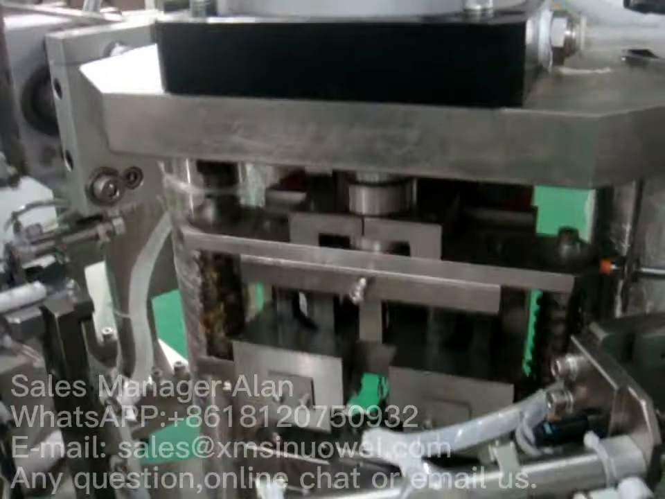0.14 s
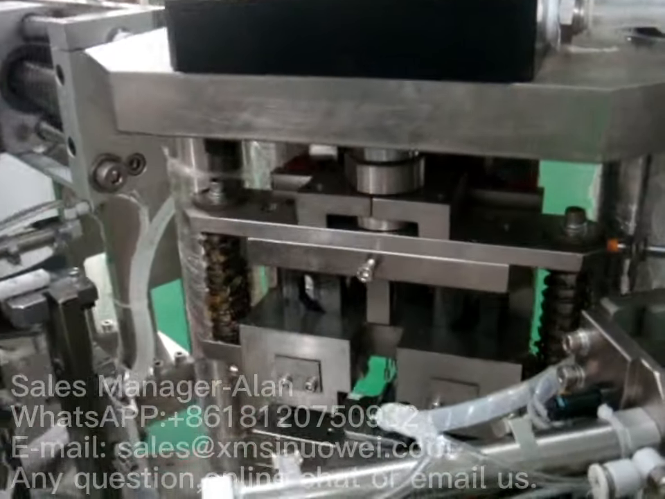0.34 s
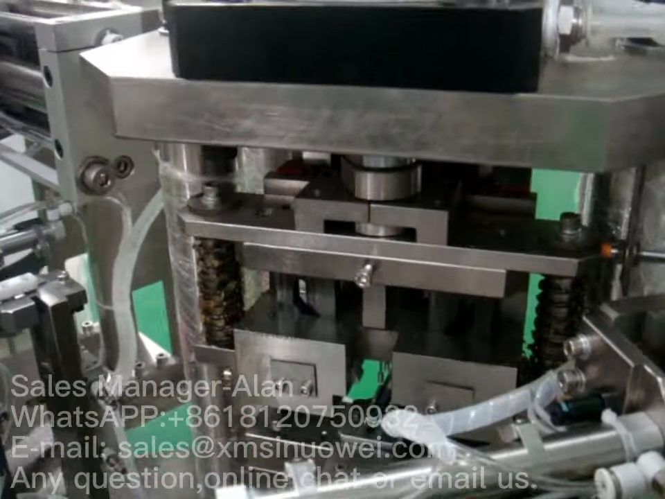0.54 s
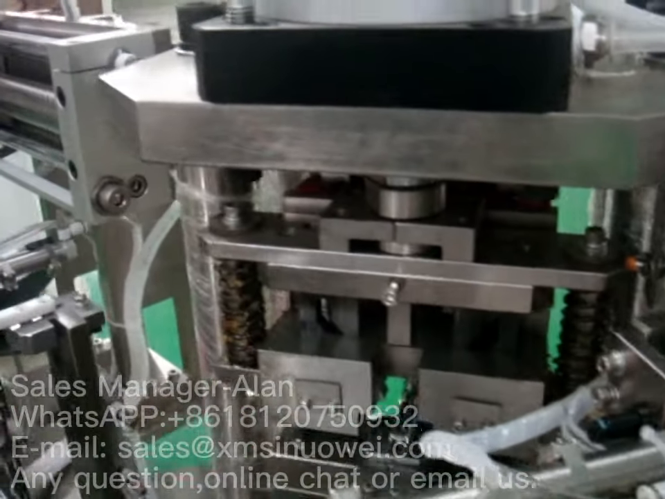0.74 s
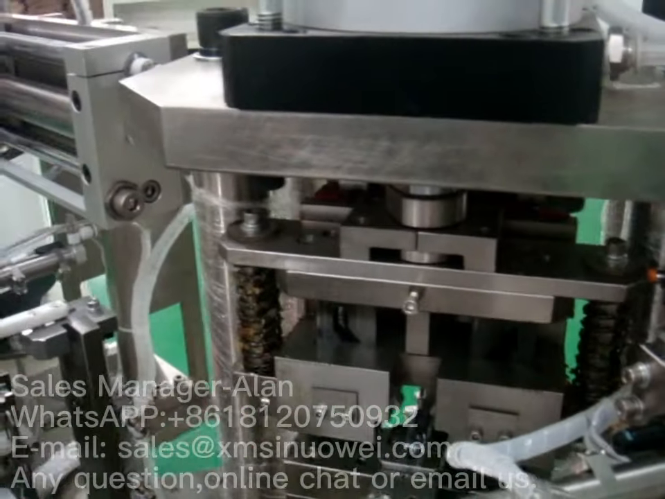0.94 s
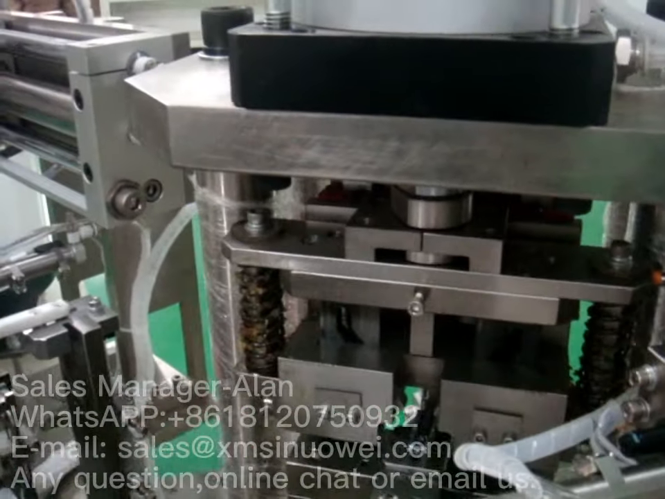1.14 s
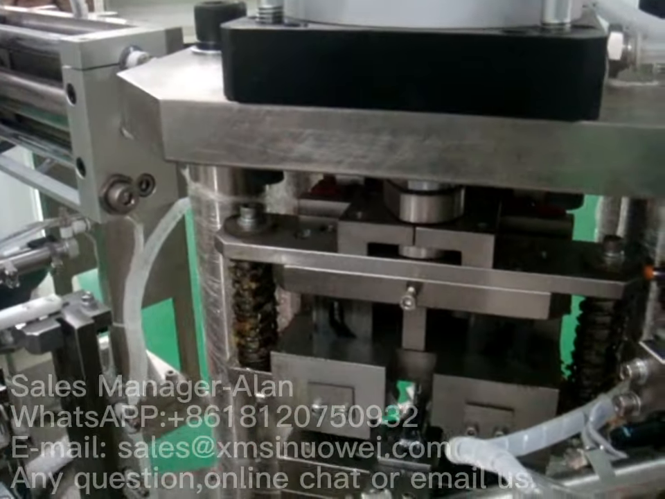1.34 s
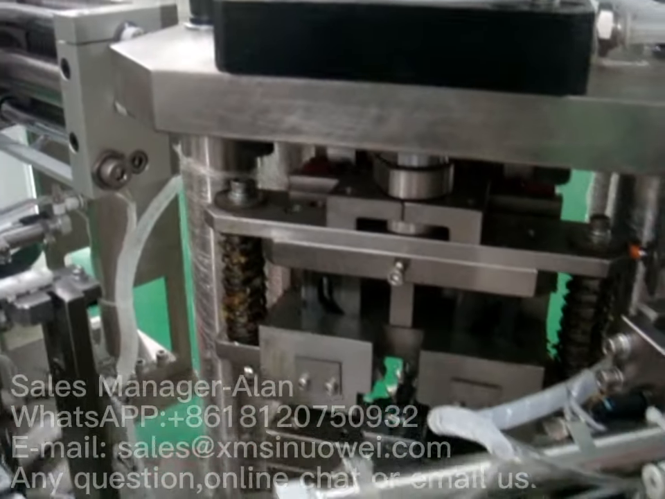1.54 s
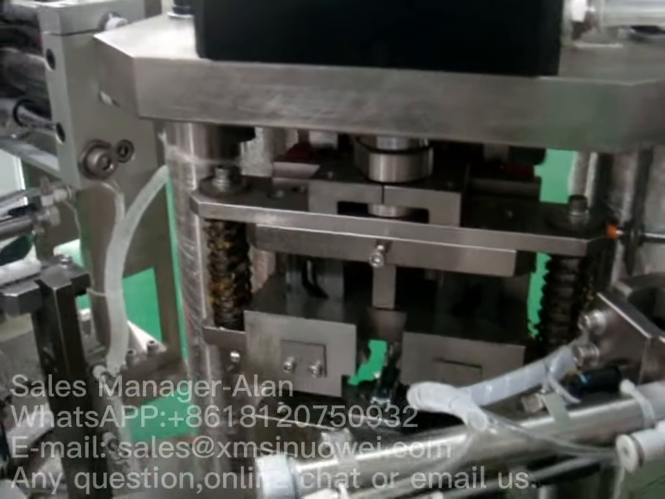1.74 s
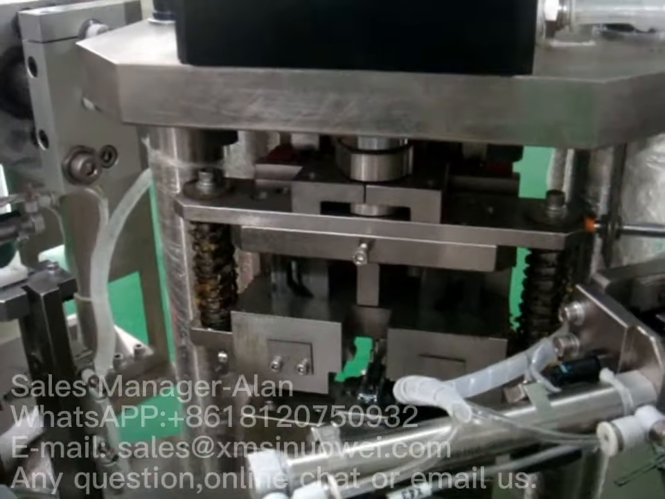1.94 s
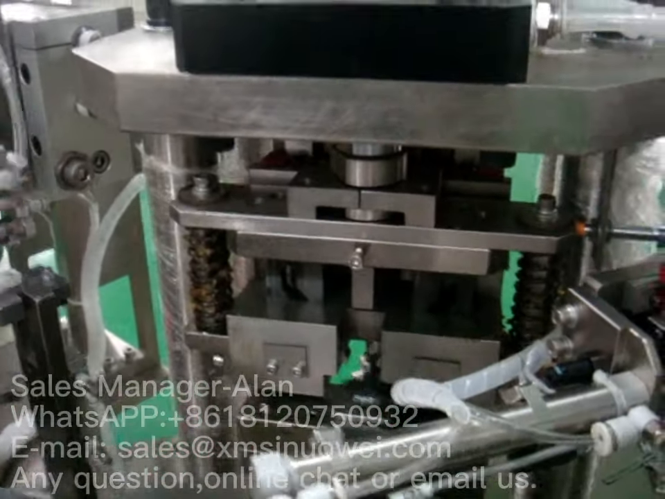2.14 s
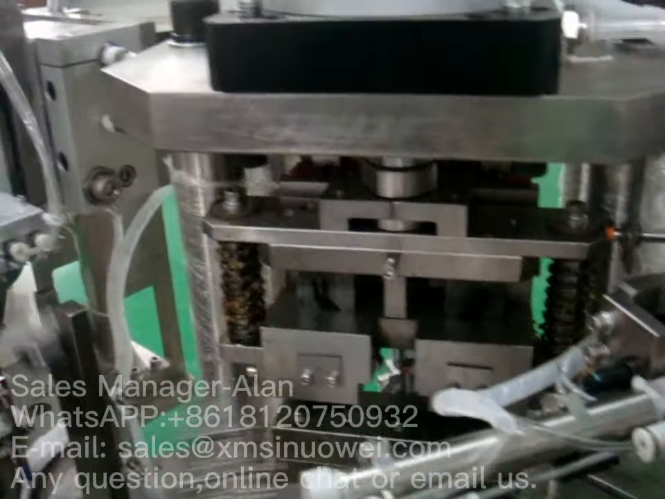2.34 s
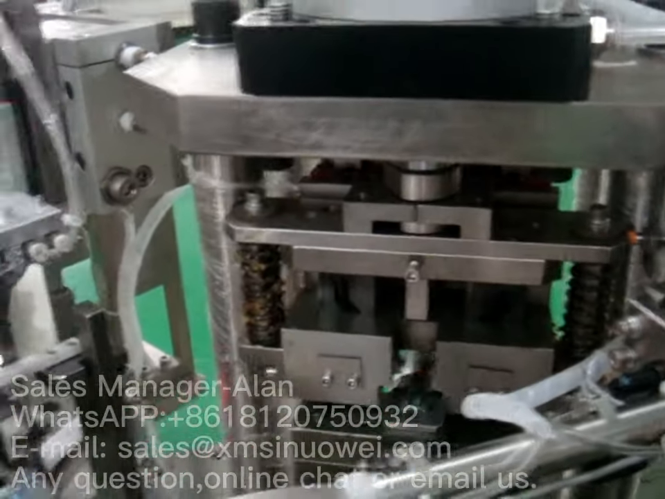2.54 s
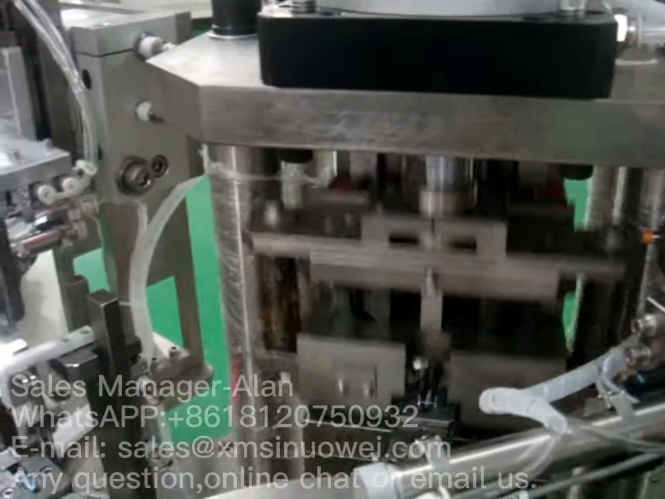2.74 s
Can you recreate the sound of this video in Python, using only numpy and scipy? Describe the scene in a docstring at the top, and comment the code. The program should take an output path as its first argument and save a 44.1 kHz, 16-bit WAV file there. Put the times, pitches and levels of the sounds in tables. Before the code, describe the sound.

Automatic assembly machinery close up: constant feeder hiss, hard cracks and thuds on a steel frame, gripper ticks, air puffs, and background machine din.

```python
"""A factory hall, with the microphones close to an automatic assembly machine.
The hall's din, drone and hum are shaped noise and tones; behind the machine's blows, bowl feeders, shaken at
twice the mains frequency, rattle small metal parts in a steady hiss: countless collisions, coloured by the bowls.
A press and slides knock on the frame in their own cycles, cylinders vent amid other swells of band noise,
grippers tick and steel parts ring; the recorder's gain control ducks the hiss after the hardest blows."""
import sys
import numpy as np
from scipy import signal
from scipy.fft import rfft, irfft, next_fast_len
from scipy.io import wavfile
from scipy.ndimage import uniform_filter1d

SR = 44100
rng = np.random.default_rng(int(sys.argv[2]) if len(sys.argv) > 2 else 0)


def output_pcm(signal):
    """Save a mono or channel-first signal as 16-bit PCM at the path in sys.argv[1].

    Samples are clipped to [-1, 1] before scaling.
    """
    pcm = np.clip(np.atleast_2d(signal).T, -1, 1) * 32767
    wavfile.write(sys.argv[1], SR, np.round(pcm).astype(np.int16))


N = 306915
TIME, PADDED = np.arange(N) / SR, next_fast_len(N, real=True)
FREQ = np.fft.rfftfreq(PADDED, 1 / SR)
# the cycles of the press and of the slides [s]; ONCE is too long to come round again
PRESS_S, SLIDE_S, ONCE = 3.396, 3.282, 99
# the pitch of a gripper's jaw and of a latch [Hz]
JAW_HZ, LATCH_HZ = 2970, 1244


def amp(db):
    """Decibels to gain."""
    return 10 ** (np.asarray(db) / 20)


def unit(x):
    """Scales to an rms of 1."""
    return x / np.sqrt(np.mean(x ** 2) + 1e-20)


def spectrum(points, hz):
    """Gain along straight lines in dB over log frequency."""
    f, db = np.transpose(points)
    return amp(np.interp(np.log(hz + 1), np.log(f), db))


def lifted(modes, hz):
    """Gain of a set of resonant bumps."""
    return amp(sum(db / (1 + (2 * (hz - f) / width) ** 2) for f, width, db in modes))


def level(curve):
    """A dB curve as a gain for every sample."""
    return amp(np.interp(TIME, *np.transpose(curve)))


def coloured(x, gain):
    """Filters x by a gain for every frequency; rms 1."""
    return unit(irfft(rfft(x, PADDED) * gain, PADDED)[:N])


def wander(rate):
    """Slow chance, up to about rate changes a second."""
    return coloured(rng.standard_normal(N), 1 / (1 + (FREQ / rate) ** 4))


def bell(hz, centre, octaves):
    """Gain of a Gaussian band over log frequency."""
    return np.exp(-.5 * (np.log2((hz + 1) / centre) / octaves) ** 2)


def add(mix, s, sound):
    """Mixes a sound in at time s."""
    part = mix[max(round(s * SR), 0):][:len(sound)]
    part += sound[:len(part)]


def at_level(sound, db):
    """Sets the rms level of the first 10 ms of a hit."""
    return amp(db) * sound / np.sqrt(np.mean(sound[:SR // 100] ** 2) + 1e-20)


def without_bass(x, edge_hz):
    """A high-pass: the struck bodies radiate little below edge_hz."""
    return signal.sosfilt(signal.butter(2, edge_hz, "high", fs=SR, output="sos"), x)


def room(x, t60=1.0, delay_s=0.011):
    """The diffuse echo of the hall: sparse random reflections that die away."""
    t = np.arange(SR) / SR
    taps = rng.standard_normal(SR) * (rng.random(SR) < 1 / 20)
    taps *= (t > delay_s) * amp(-60 * t / t60)
    return signal.fftconvolve(x, taps / np.linalg.norm(taps))[:N]


def hall(din_db=0.9, lumpy_db=1.0, drone_db=-7, drone_hz=170):
    """The uneven din of other machines, a low drone of the drives and the feeder magnets' hum."""
    # colour of the distant din: (frequency [Hz], relative density [dB per Hz])
    din_colour = [(25, -47.5), (70, -29), (115, -20.5), (150, -11.5), (250, -10.5), (350, -9.5),
                  (400, -3.5), (600, 0), (900, 1.5), (1300, -1), (2000, 0.5), (4000, -25), (9000, -40)]
    # resonances in the din: (frequency [Hz], width [Hz], lift [dB])
    din_modes = [(150, 6.4, 6.1), (291, 20, 5), (326, 13, 4.8), (375, 29, 3.7), (674, 3.4, 5),
                 (953, 31, 4.8), (1046, 81, 6.1), (1230, 110, 2.3)]
    # level of the din, before din_db: (time [s], level [dB])
    din_level = [(0.0, -31), (.7, -31), (1.9, -30.5), (3.4, -31.5), (4.2, -30), (5.7, -28.5), (6.96, -30)]
    # level of the drone, before drone_db: (time [s], level [dB])
    drone_level = [(0.0, -51), (.7, -45), (1.9, -62), (3.2, -63), (3.9, -42.5), (4.7, -44.5), (5.3, -50),
                   (6.2, -41), (6.96, -52)]
    # tones of the magnets: (frequency [Hz], mean level [dB])
    hum_tones = [(100.13, -57), (701, -47), (1051, -45.5)]
    din = coloured(rng.standard_normal(N), spectrum(din_colour, FREQ) * lifted(din_modes, FREQ))
    din *= level(din_level) * amp(din_db + lumpy_db * wander(25))
    drone = coloured(rng.standard_normal(N), bell(FREQ, drone_hz, 0.5))
    drone *= level(drone_level) * amp(drone_db)
    hum = np.zeros(N)
    for hz, db in hum_tones:
        strength = amp(db + 0.45 * wander(3)) * np.sqrt(2)
        hum += strength * np.sin(2 * np.pi * hz * TIME + hz / 900 * wander(9.1))
    return din + drone + hum


def feeders(hits_per_s=9000, size_db=3.0, wash=0.65, ring_t60=0.015, shake_hz=100.13, throb=0.035,
            flutter_db=0.5, patchy_db=0.58, gain_db=3.0, treble_db=0.58, dulling_db_per_s=0.17):
    """Countless tiny collisions, bunched by each shake of the bowl, over the wash of their echoes."""
    # colour of the rattling parts: (frequency [Hz], relative density [dB per Hz])
    rattle_colour = [(500, -44.5), (1000, -13), (1600, -9.5), (2200, -5.5), (2900, -4), (4000, -2),
                     (5700, -0.75), (6700, -1.85), (7600, -1.9), (8700, -3.5), (10000, -7)]
    # resonances of the bowls and tracks: (frequency [Hz], width [Hz], lift [dB])
    bowl_modes = [(2106, 58, 5), (2830, 130, 2), (3000, 12, -0.5), (3450, 56, 3), (4710, 99, -1),
                  (6090, 53, 4.5), (6560, 40, 0), (6640, 51, 7.5), (8030, 170, -3.5)]
    # how busy the bowls are, before gain_db: (time [s], level [dB])
    feed_level = [(0.0, -20), (.6, -19.5), (1.05, -20.5), (1.5, -18.5), (2.7, -20), (3.9, -19.5),
                  (4.6, -19.5), (5.7, -19.5), (6.2, -19), (6.96, -20)]
    t = np.arange(SR // 50) / SR
    size = amp(size_db * np.minimum(rng.exponential(1, N), 4))
    size *= rng.random(N) < hits_per_s / SR
    size *= rng.choice([-1, 1], N)
    # every way of colliding has its own brief ring
    rings = rng.standard_normal(size=(24, len(t))) * amp(-60 * t / ring_t60)
    kind = rng.integers(0, len(rings), N)
    hits = sum(signal.oaconvolve(size * (kind == k), ring)[:N] for k, ring in enumerate(rings))
    shake = 1 + throb * np.cos(2 * np.pi * shake_hz * TIME)
    drive = unit(hits) * shake + wash * rng.standard_normal(N)
    rattle = coloured(drive, spectrum(rattle_colour, FREQ) * lifted(bowl_modes, FREQ))
    # as parts bunch up and thin out along the tracks, the colour shifts; the treble slowly dulls
    hz, when, z = signal.stft(rattle, SR, nperseg=512)
    treble = np.clip((hz[:, None] - 5500) / 2000 + .5, 0, 1)
    patches = uniform_filter1d(rng.standard_normal(z.shape), size=10, axis=0)
    patches = unit(uniform_filter1d(patches, size=16, axis=1))
    z *= amp(treble * (treble_db - dulling_db_per_s * when) + patchy_db * patches)
    rattle = signal.istft(z, SR, nperseg=512)[1][:N]
    return rattle * level(feed_level) * amp(gain_db + flutter_db * wander(25))


def jingles(per_s=70, low_hz=2300, high_hz=8500, floor_db=-29, spread_db=0.5, t60=0.14):
    """Here and there a single part tumbles and rings above the rest, as a decaying sine."""
    out, t = np.zeros(N), np.arange(SR // 8) / SR
    for when, pitch, size in rng.random((round(per_s * N / SR), 3)):
        hz = low_hz * (high_hz / low_hz) ** pitch
        ring = np.sin(2 * np.pi * hz * t) * amp(-60 * t / t60)
        add(out, when * N / SR, ring * amp(floor_db - spread_db * np.log(max(size, np.exp(-4)))))
    return out


def noise_swells(spread_octaves=0.57):
    """Band noise that swells and fades: venting cylinders, swells around 2.5 kHz, bright bursts."""
    # mostly venting cylinders; the two at 2500 Hz are plain swells of band noise, the two of 0.14 s are
    # short bright bursts around the ringing steel part:
    # (time [s], length [s], level before the swell [dB], centre [Hz])
    swells = [(.33, .34, -26.5, 3300), (1.35, 0.14, -20, 4870), (2.528, 0.33, -24, 6200),
              (2.879, 0.31, -29, 3300), (4.219, 0.36, -27, 4000), (4.528, .14, -23, 5200),
              (5.897, .42, -27.5, 5800), (6.284, 0.23, -25, 2500), (6.636, .2, -25.5, 2500)]
    out, t = np.zeros(N), np.arange(SR // 2) / SR
    hz = np.fft.rfftfreq(len(t), 1 / SR)
    for s, length, db, centre in swells:
        hiss = irfft(rfft(rng.standard_normal(len(t))) * bell(hz, centre, spread_octaves), len(t))
        swell = np.sin(np.pi * np.clip(t / length, 0, 1))
        add(out, s, unit(hiss) * amp(db) * swell)
    return out


def ticks(gain_db=-1.74, detune=0.0756, side_db=-2, ring_t60=0.038, snap_db=-2, snap_t60=0.019):
    """A small jaw snaps shut and rings briefly in three close modes."""
    # light clicks of grippers and valves: (time [s], level before gain_db [dB], pitch [Hz])
    clicks = [ (.465, -20, JAW_HZ), (.551, -18, JAW_HZ), (1.53, -15.5, JAW_HZ), (1.597, -15, JAW_HZ),
              (1.907, -14, JAW_HZ), (2.438, -20, JAW_HZ), (2.673, -17, JAW_HZ), (2.817, -15.5, LATCH_HZ),
              (3.736, -14.5, JAW_HZ), (3.928, -14.5, 5330), (6.212, -13.5, LATCH_HZ), (6.452, -18, 2450),
              (6.781, -15.5, JAW_HZ), (6.946, -17, LATCH_HZ)]
    out, t = np.zeros(N), np.arange(SR // 5) / SR
    for s, db, hz in clicks:
        ring = np.zeros(len(t))
        for k in (-1, 0, 1):
            turns = hz * (1 + k * detune) * t + rng.random()
            ring += amp(side_db * abs(k)) * np.sin(2 * np.pi * turns)
        snap = amp(snap_db - 60 * t / snap_t60) * rng.standard_normal(len(t))
        add(out, s, at_level(ring * amp(-60 * t / ring_t60) + snap, db + gain_db))
    return out


def metal(contacts, modes, scrape_db, scrape_t60, rise_s=0.00037):
    """A piece of steel chatters on contact, then rings in its modes."""
    out, t = np.zeros(N), np.arange(SR // 2) / SR
    for s, db in contacts:
        ring = np.zeros(len(t))
        for hz, size_db, t60 in modes:
            ring += amp(size_db - 60 * t / t60) * np.sin(2 * np.pi * (hz * t + rng.random()))
        # while the piece still bounces, its ring is rough
        bounce = unit(uniform_filter1d(rng.standard_normal(len(t)), size=150))
        chatter = 1 + 0.45 * np.exp(-t / 0.049) * bounce
        scrape = amp(scrape_db - 60 * t / scrape_t60) * rng.standard_normal(len(t))
        hit = (ring * chatter + scrape) * (1 - np.exp(-t / rise_s))
        add(out, s, at_level(hit, db))
    return out


def blows(bumps_per_s=2, bump_db=-30.5, low_hz=450, high_hz=1500, bump_t60=.09):
    """Every blow as (s, dB, centre Hz, t60 s): the machine's cycles, then faint bumps of other stations."""
    # blows on the frame: (first time [s], repeats every [s], level [dB], change by the next cycle [dB],
    # centre [Hz], t60 [s])
    cycles = [ (1.044, PRESS_S, -19.5, 3.5, 860, 0.22), (1.68, PRESS_S, -18.5, 3, 706, .23),
              (2.913, PRESS_S, -10.5, 0, 1950, 0.1), (2.921, PRESS_S, -15, 3.5, 910, 0.15),
              (3.070, PRESS_S, -21, -5, 374, .06), (.261, SLIDE_S, -20, -4, 800, 0.064),
              (.482, SLIDE_S, -17.5, -2, 1600, 0.065), (0.774, SLIDE_S, -7.5, -1.5, 3580, 0.023),
              (2.071, SLIDE_S, -26.5, 2.5, 403, .27), (.13, ONCE, -27, 0, 457, .055),
              (.544, ONCE, -30, 0, 433, 0.36), (1.276, ONCE, -28.5, 0, 343, 0.59),
              (3.485, ONCE, -24, -4, 497, .05), (3.88, ONCE, -31, -1, 220, 0.2),
              (4.475, ONCE, -23.5, -3.5, 320, 0.33), (6.77, ONCE, -21, 0, 980, 0.17)]
    rows = []
    for first, period, db, change_db, centre, t60 in cycles:
        for cycle, s in enumerate(np.arange(first, N / SR, period)):
            rows.append((s, db + cycle * change_db, centre, t60))
    for when, pitch in rng.random((round(bumps_per_s * N / SR), 2)):
        rows.append((when * N / SR, bump_db, low_hz * (high_hz / low_hz) ** pitch, bump_t60))
    return rows


def knocks(thud_hz=420, thud_octaves=0.18, spread_per_octave=0.62, rise_s=0.00095,
           clatter_db=-5.0, clatter_ratio=3.5):
    """Each blow stirs the dense modes of the frame; loose fittings clatter, mostly higher."""
    # what the frame rings with: (frequency [Hz], width [Hz], lift [dB])
    frame_modes = [(409.3, 13, 8), (463, 50, 3), (534, 82, 5), (646, 20, 14), (820, 57, 2), (937, 124, 9.5),
                   (1310, 41, 12), (1624, 52, 11.5)]
    out, t = np.zeros(N), np.arange(SR // 2) / SR
    hz = np.fft.rfftfreq(len(t), 1 / SR)

    def stirred(centre, octaves, t60):
        """Modes around a centre ring out from a starting level of about 1."""
        phases = np.exp(2j * np.pi * rng.random(len(hz)))
        ring = irfft(phases * bell(hz, centre, octaves) * lifted(frame_modes, hz), len(t))
        ring *= (1 - np.exp(-t / rise_s)) * amp(-60 * t / t60)
        return ring * np.sqrt(t60 * SR / np.log(1e6) / np.sum(ring ** 2))

    for s, db, centre, t60 in blows():
        # a thud on the frame's main mode rings narrowly, other blows spread wider
        octaves = thud_octaves + spread_per_octave * abs(np.log2(centre / thud_hz))
        clatter = stirred(min(centre * clatter_ratio, 2900), 0.42, t60)
        add(out, s, amp(db) * (stirred(centre, octaves, t60) + amp(clatter_db) * clatter))
    return out


def scene(room_db=-9, small_room_db=-11):
    """The stations work amid the feeders' hiss; both channels carry the same sound."""
    # a steel part drops and rings: (time [s], level before the high-pass [dB])
    chimes = [(1.386, -15), (4.570, -13.5)]
    # the steel part's modes: (frequency [Hz], relative level [dB], t60 [s])
    steel_modes = [(3140, -1.5, 0.72), (4500, -24, .25), (4230, -2, 0.5), (4590, 3.5, 0.49),
                   (4700, -7, 0.18), (4950, 0, 0.078), (6156, 3.5, 0.21), (6200, -9.5, 0.34),
                   (8100, -11, 0.08), (8530, -5, 0.25)]
    # a slide meets its metal stop: (time [s], level before the high-pass [dB])
    clinks = [(2.372, -17), (5.677, -18.5)]
    # the stop's modes: (frequency [Hz], relative level [dB], t60 [s])
    stop_modes = [(1267, -7.5, 0.41), (1730, -4, 0.11), (2376, 5, 0.049), (2480, -16, .1),
                  (2390, -2.5, 0.21), (2460, 5, 0.057)]
    small = ticks() + metal(chimes, steel_modes, scrape_db=-2.5, scrape_t60=0.086)
    small += metal(clinks, stop_modes, scrape_db=-1, scrape_t60=0.025)
    small = without_bass(small, edge_hz=850)
    heavy = without_bass(knocks(), edge_hz=240)
    echo = room(amp(room_db) * heavy + amp(small_room_db) * small)
    mix = hall() + feeders() + jingles() + noise_swells() + small + heavy + echo
    return np.array([mix, mix])


def record(dry, threshold_db=-12.0, squeeze=0.76, attack_s=0.00081, recover_db_per_s=45,
           slow_threshold_db=-15.0, slow_attack_s=0.016, slow_recover_db_per_s=12, edge_hz=10130):
    """Gain control lets go quickly after a crack, slowly after a heavy blow; then soft peaks, band limit."""
    def smoothed(x, seconds):
        """A running average that forgets in the given time."""
        keep = np.exp(-1 / (seconds * SR))
        return signal.lfilter([1 - keep], [1, -keep], x)

    def excess(seconds, limit_db, db_per_s):
        """How far the power has risen over a limit, held and slowly let go."""
        power_db = 10 * np.log10(smoothed((dry ** 2).mean(0), seconds) + 1e-12)
        fall = TIME * db_per_s
        held_db = np.maximum.accumulate(power_db + fall) - fall
        return np.maximum(held_db - limit_db, 0)

    quick_db = excess(attack_s, threshold_db, recover_db_per_s)
    slow_db = excess(slow_attack_s, slow_threshold_db, slow_recover_db_per_s)
    over_db = smoothed(np.maximum(quick_db, slow_db), attack_s)
    ducked = dry / amp(squeeze * over_db)
    # peaks are rounded off towards 0.72
    ducked /= (1 + (ducked / .72) ** 6) ** (1 / 6)
    low_pass = signal.firwin(801, edge_hz, window=("kaiser", 9), fs=SR)
    return signal.oaconvolve(ducked, low_pass[None], "same")


dry = scene()
out = record(dry)
output_pcm(out)
```